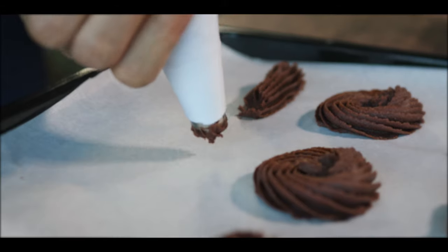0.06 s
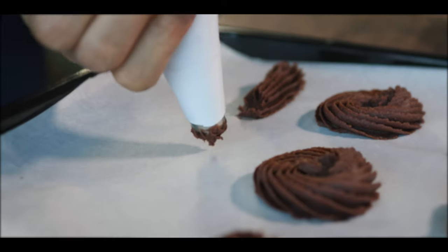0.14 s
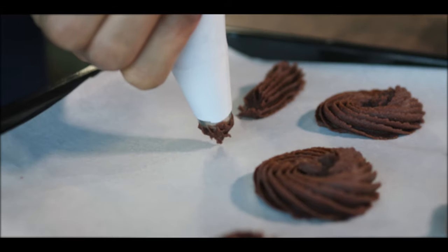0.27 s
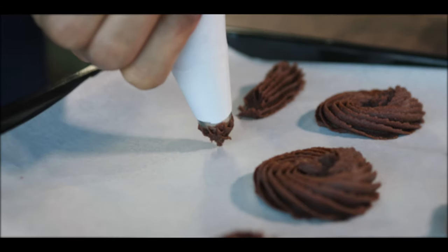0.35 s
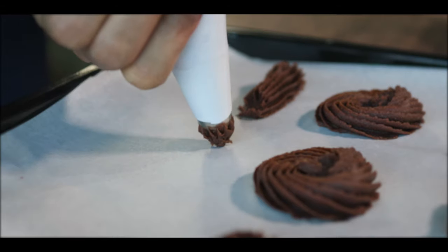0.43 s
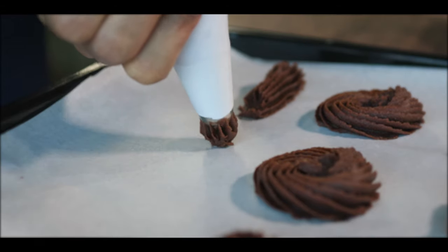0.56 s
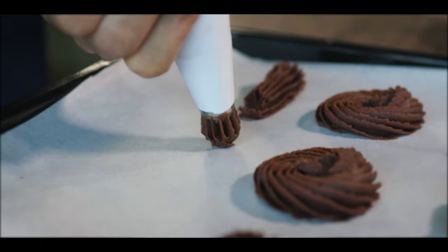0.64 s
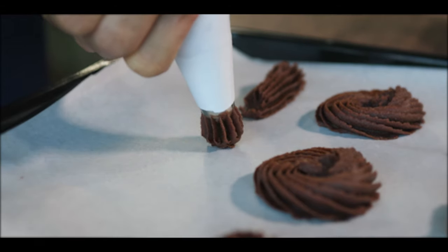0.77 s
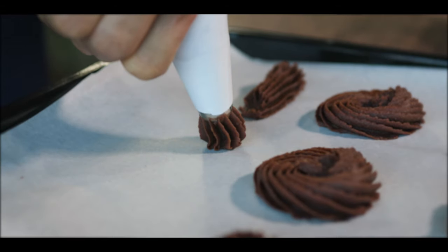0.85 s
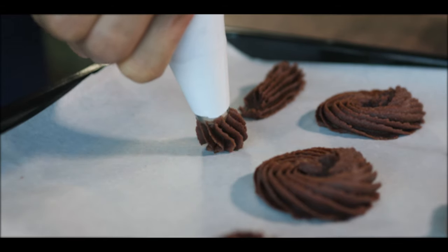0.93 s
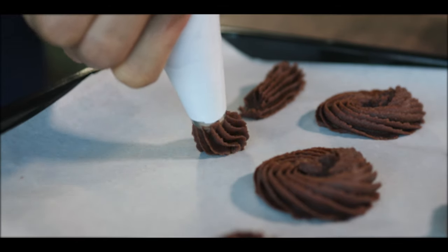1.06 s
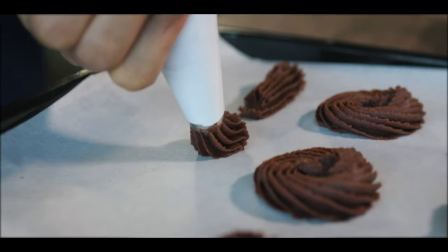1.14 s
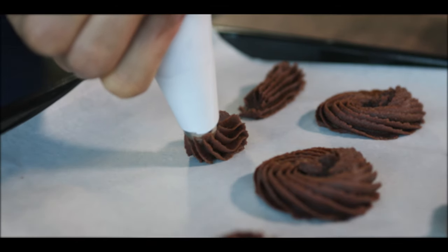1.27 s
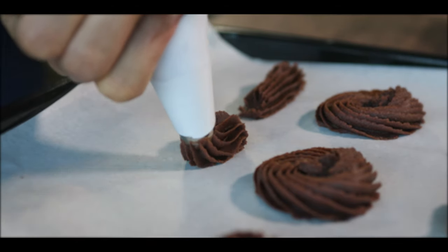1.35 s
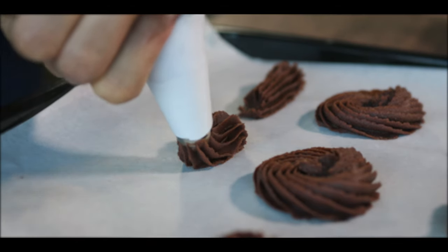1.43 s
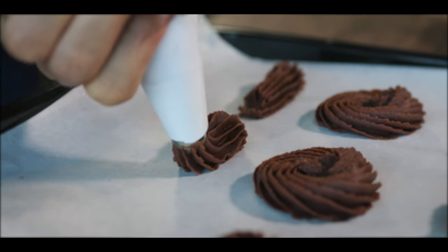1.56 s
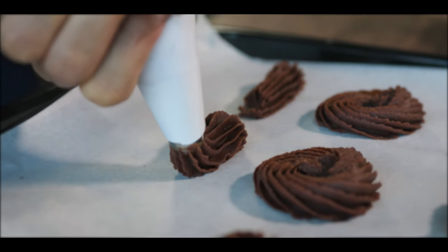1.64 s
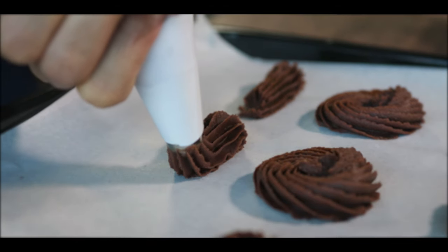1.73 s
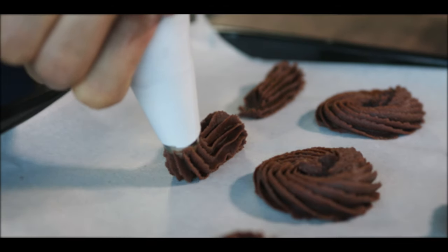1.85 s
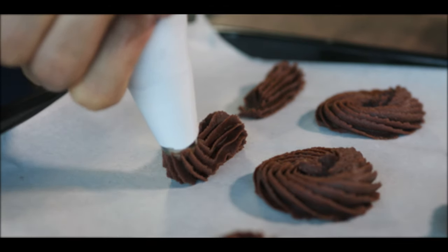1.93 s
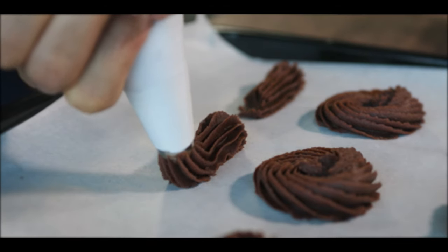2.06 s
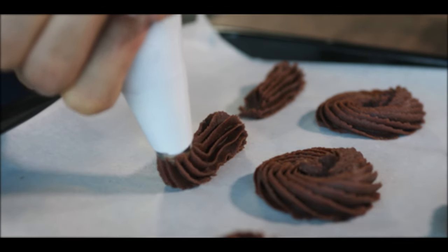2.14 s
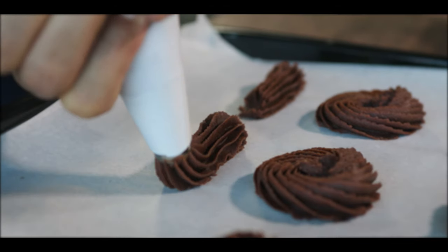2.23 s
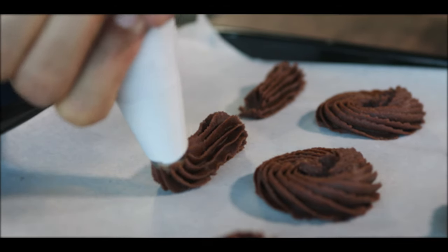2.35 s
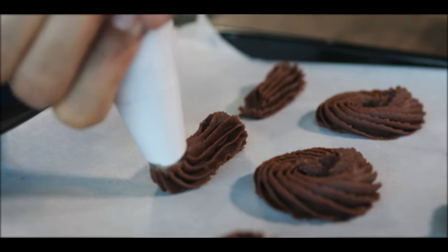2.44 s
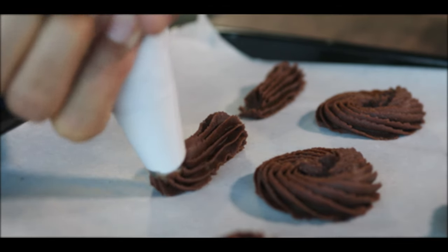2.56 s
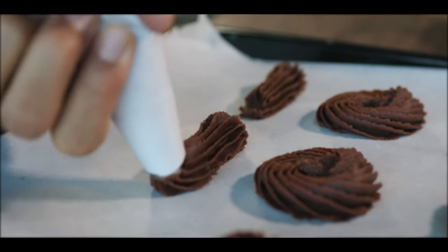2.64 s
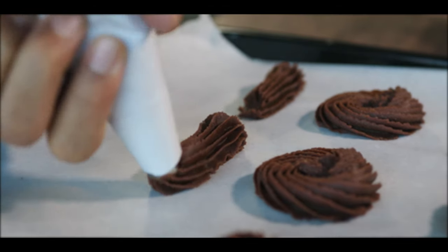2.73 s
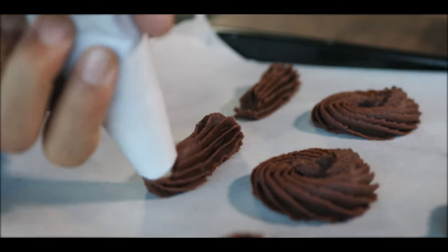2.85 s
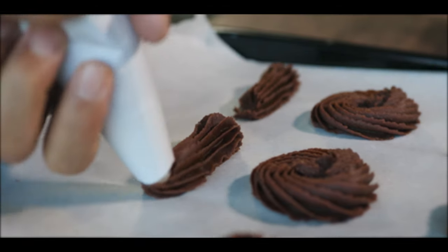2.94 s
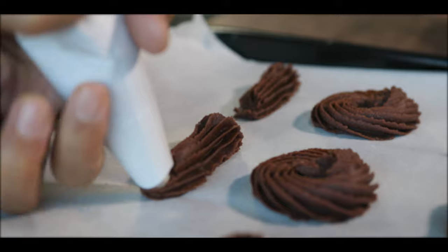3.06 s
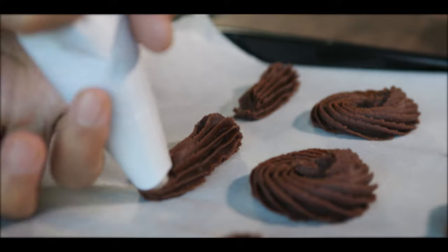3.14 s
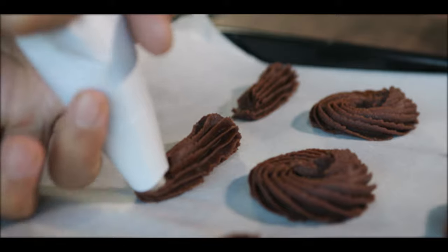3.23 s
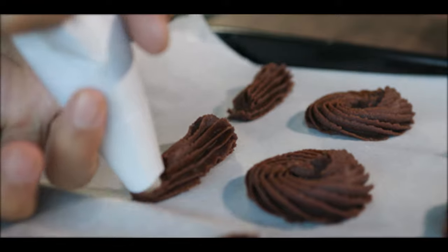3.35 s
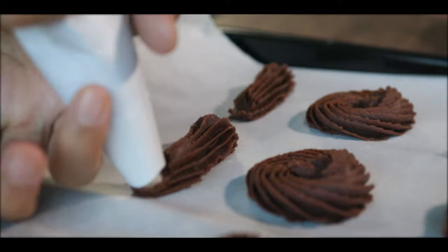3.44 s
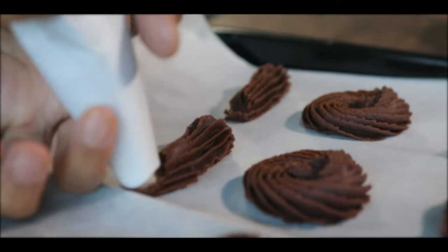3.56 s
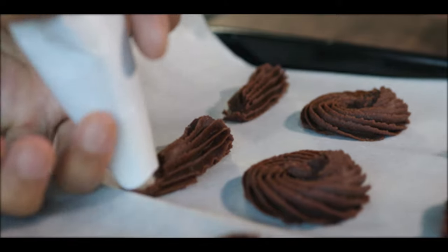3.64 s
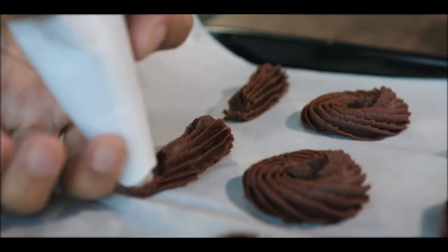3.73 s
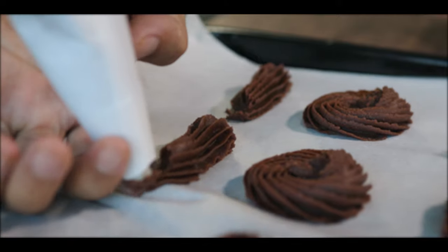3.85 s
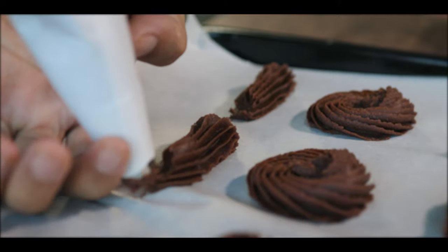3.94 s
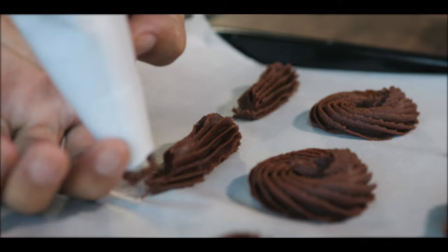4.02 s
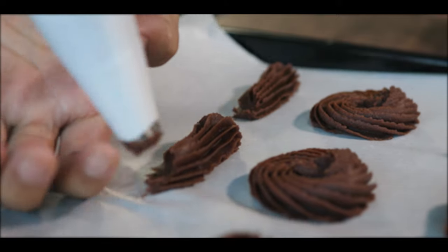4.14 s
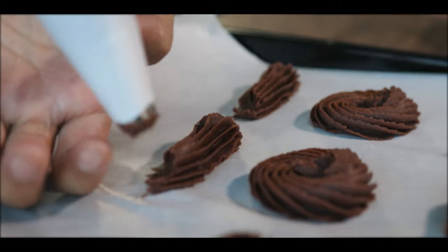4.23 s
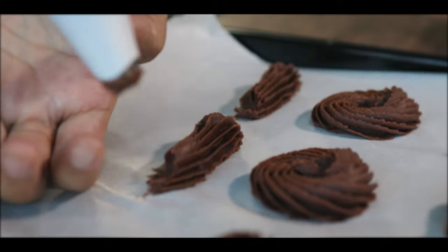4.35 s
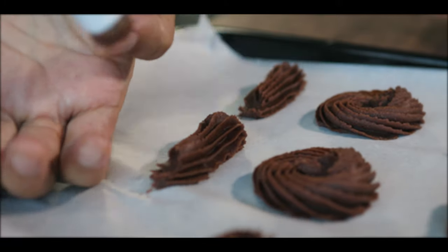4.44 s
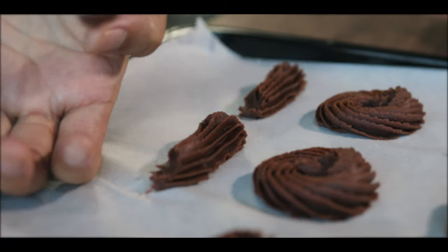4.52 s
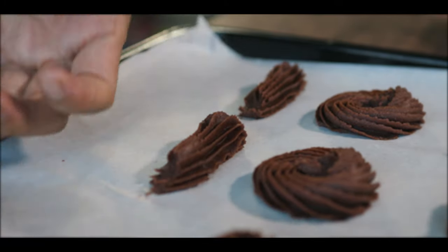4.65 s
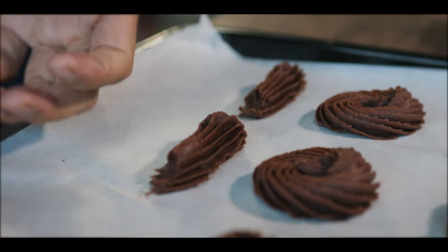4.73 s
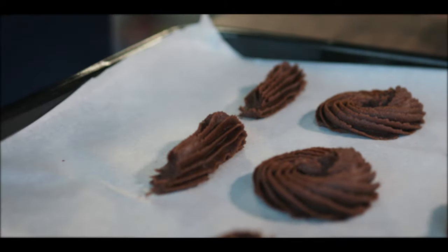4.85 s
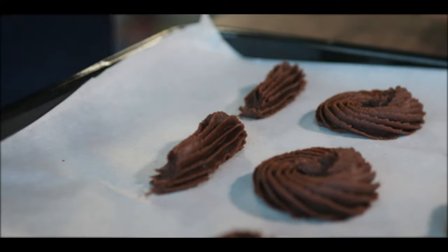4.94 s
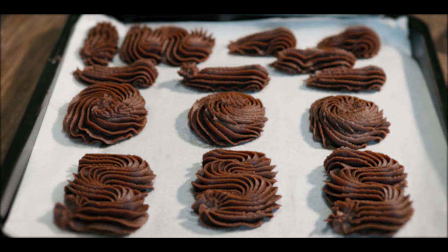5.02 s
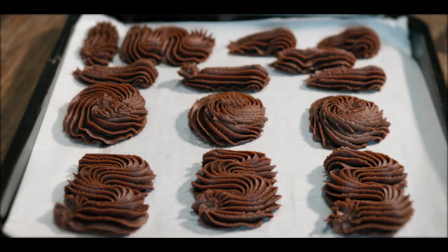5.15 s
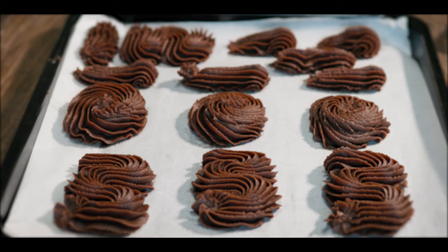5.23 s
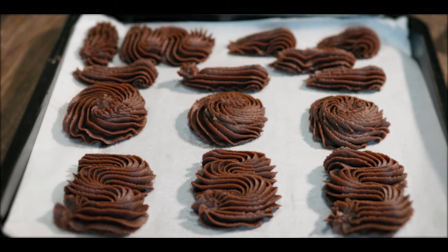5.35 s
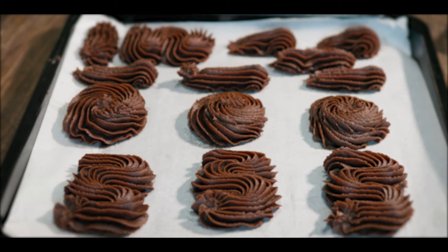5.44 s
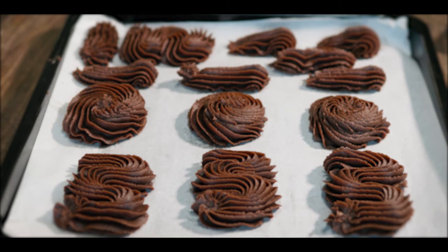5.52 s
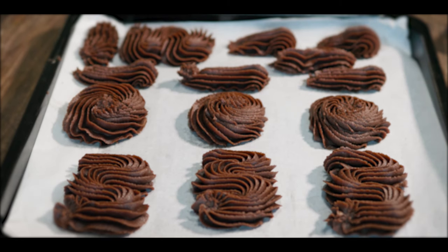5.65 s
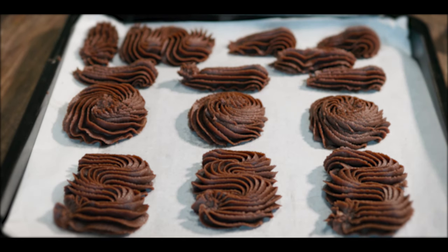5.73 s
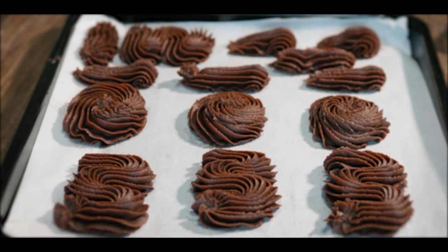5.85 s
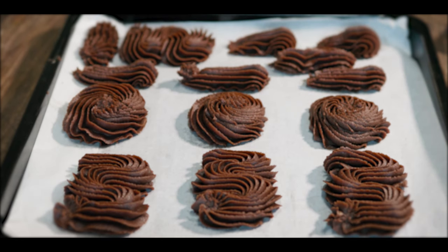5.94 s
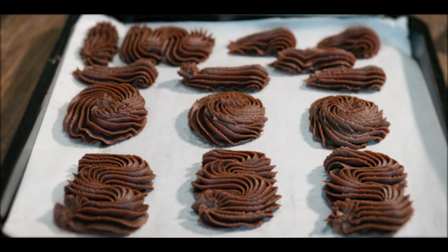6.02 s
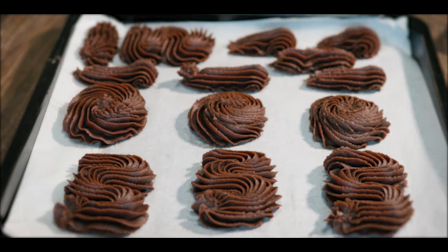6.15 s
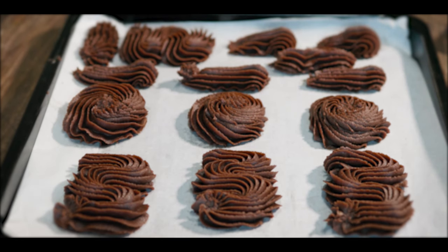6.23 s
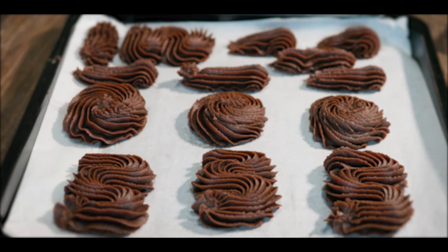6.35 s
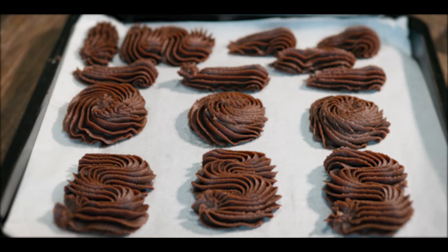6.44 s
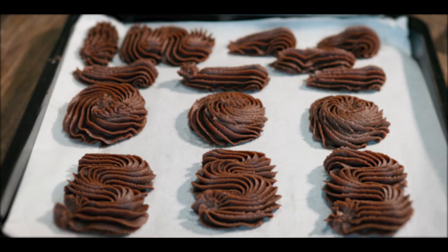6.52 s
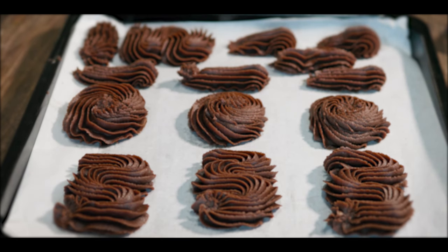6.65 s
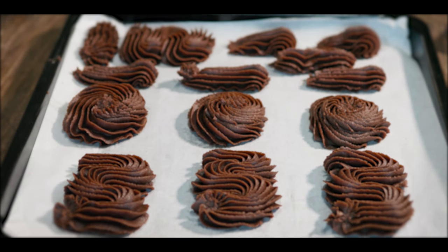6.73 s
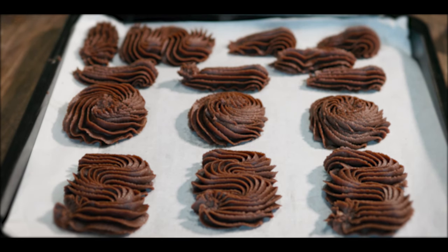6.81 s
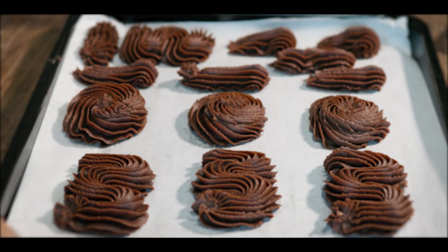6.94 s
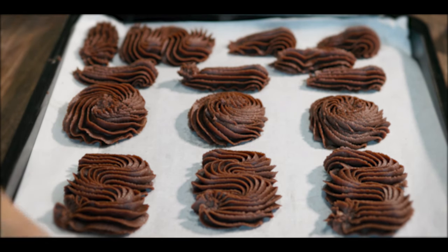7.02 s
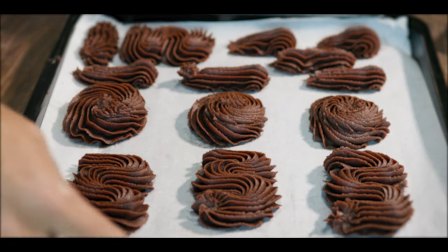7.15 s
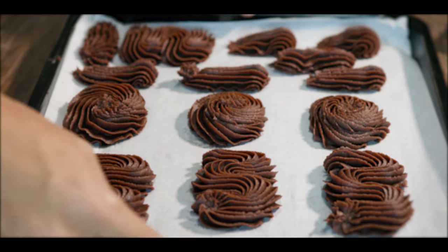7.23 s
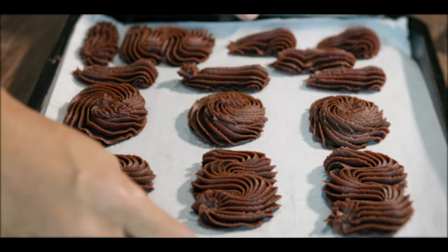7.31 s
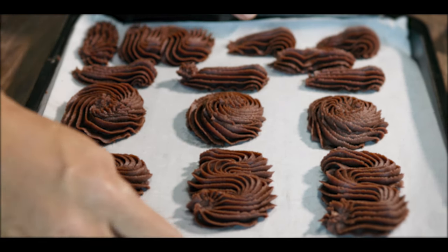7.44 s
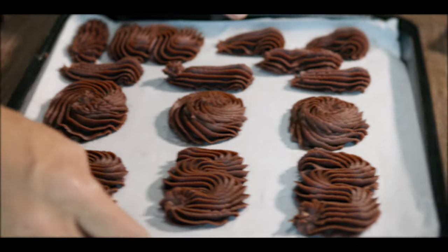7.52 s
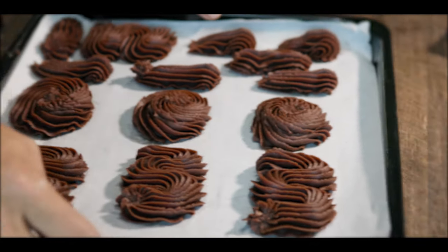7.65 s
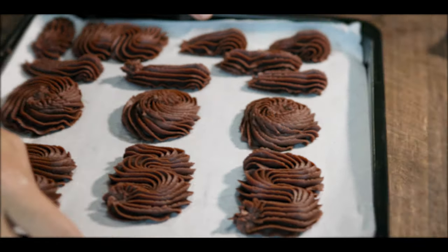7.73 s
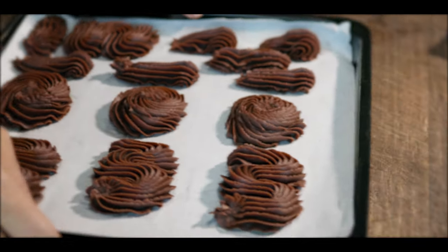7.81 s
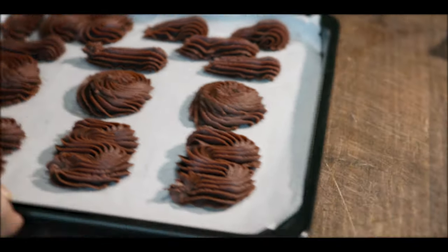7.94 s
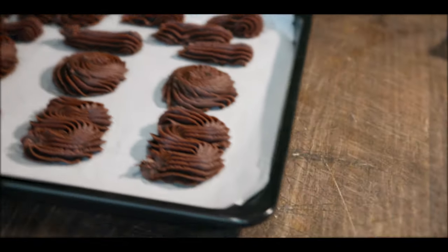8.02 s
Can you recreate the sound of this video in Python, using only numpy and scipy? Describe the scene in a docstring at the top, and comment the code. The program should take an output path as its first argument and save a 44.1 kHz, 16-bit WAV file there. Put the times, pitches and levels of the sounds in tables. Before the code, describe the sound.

A quiet kitchen, heard close, with faint room air and a low, slightly wavering appliance hum. From 0 to 2.7 s a plastic piping bag creaks very softly, with small ticks clearest in the first second and sparse afterwards. From 2.7 s fingers rustle the film; at 3.1 to 4.1 s it crackles densely, with sharp snaps, quick rubs and dull pops, the brightest, loudest snap just before 4 s. Crackles thin out, and a crisp, very bright snap and swish come around 4.5 s, then smoother rustle to 5.1 s. There a cut removes the hum and leaves louder, brighter air. Soft skin brushing and deep faint bumps follow, with a brief brighter rub near 6.95 s. At 7.24 to 7.5 s a metal tray is knocked dully; it grinds and sings over wood, strongest near 7.7 s, then ends in knocks and chatter around 8 s.

```python
"""A quiet kitchen with a hum: a plastic piping bag creaks, then crackles sharply as hands lift it off baking paper.
After a cut the room is brighter and the hum is gone; a hand brushes in, knocks the metal tray and slides it
over a wooden counter. Shaped noise makes the air, film, skin and sliding; short noise bursts make the snaps;
damped sines make the dull pops, the tray's ring and the deep bumps. A short noise tail is the kitchen's answer."""
import sys
import numpy as np
from scipy import signal
from scipy.fft import rfft, irfft
from scipy.io import wavfile
from scipy.ndimage import uniform_filter1d

SR = 44100
rng = np.random.default_rng(int(sys.argv[2]) if len(sys.argv) > 2 else 0)


def dump_mix(stems):
    """Bounce the given channels to the path in sys.argv[1] as a 16-bit WAV at rate SR."""
    frames = np.atleast_2d(stems).T  # one column per channel
    limited = np.clip(frames, -1, 1)  # hard clip at full scale
    pcm = np.round(limited * 32767).astype(np.int16)
    wavfile.write(sys.argv[1], SR, pcm)


def invert_db(x):
    """Field ratio 10**(x/20) for x, a level in decibels (scalar or array-like)."""
    u = np.asarray(x, float) / 20
    return 10 ** u


N = 356328  # samples, about 8.1 s


def evened(x):
    """Scales to rms 1."""
    return x / np.sqrt(np.mean(x ** 2) + 1e-20)


def read(points, hz):
    """Reads a spectrum on a log-frequency axis."""
    f, value = np.transpose(points)
    return np.interp(np.log(hz + 1), np.log(f + 1), value)


def add(mix, s, sound):
    """Mixes a sound in at time s."""
    part = mix[round(s * SR):][:len(sound)]
    part += sound[:len(part)]


def follow(rows, column=1):
    """One column of a curve over time, per sample."""
    table = np.transpose(rows)
    return np.interp(np.arange(N) / SR, table[0], table[column])


def level(rows):
    """Gain and treble tilt (dB) of a curve, silent outside its span."""
    t = np.arange(N) / SR
    sounding = (t > rows[0][0]) * (t <= rows[-1][0])
    return invert_db(follow(rows)) * sounding, follow(rows, column=2)


def colour(x, points):
    """Filters by a spectrum table, with nothing above 15.75 kHz; rms 1."""
    hz = np.fft.rfftfreq(N, 1 / SR)
    return evened(irfft(rfft(x) * invert_db(read(points, hz)) * (hz < 15750), N))


def resonate(x, hz, width):
    """A resonance of gain 1, width in Hz."""
    r = np.exp(-np.pi * width / SR)
    pole = r * np.exp(2j * np.pi * hz / SR)
    return 2 * signal.lfilter([1 - r], [1, -pole], x).real


def rubbing(curve, points, per_s, spread_db, smooth, grain_s):
    """Friction: tiny random slips, each with its own pitch region, blended with a smooth hiss."""
    slipping = rng.random(N) < per_s / SR
    size = invert_db(spread_db * np.minimum(rng.exponential(1, N), 3)) * slipping
    region, noise, slips = rng.integers(0, 8, N), rng.standard_normal(N), np.zeros(N)
    for k, hz in enumerate(np.geomspace(900, 14000, 8)):
        decay = signal.lfilter([1], [1, -np.exp(-1 / (grain_s * SR))], size * (region == k))
        grains = noise * decay
        pitched = resonate(resonate(grains, hz, 0.58 * hz), hz, 0.58 * hz)
        slips += 0.2 * grains + pitched
    x = colour(smooth * rng.standard_normal(N) + (1 - smooth) * evened(slips), points)
    # the tilt pivots the treble around 4 kHz
    dull = signal.sosfiltfilt(signal.butter(1, 4000, fs=SR, output="sos"), x)
    gain, tilt_db = curve
    return (dull * invert_db(-tilt_db / 2) + (x - dull) * invert_db(tilt_db / 2)) * gain


def rings(rows):
    """Damped sines with a soft start; rows of t/s, start level/dB, f/Hz, t60/s."""
    out, t = np.zeros(N), np.arange(SR // 2) / SR
    for s, db, hz, t60 in rows:
        decay = invert_db(db - 60 * t / t60)
        soft_start = 1 - np.exp(-t * hz * 4)
        add(out, s, -decay * soft_start * np.sin(2 * np.pi * hz * t))
    return out


# spectra of the room air before and after the cut: f/Hz, density level/dB per Hz
AIR = [(12, -44.5), (20, -14.5), (49, -3), (104, -4), (126, -10.5), (153, -6), (298, -1), (441, -9.5),
       (551, -11.5), (708, -15.5), (791, -14.5), (1880, -32), (5410, -28), (6400, -31.5), (15600, -25)]
AIR_AFTER = [(12, -29), (20, -4), (55, -4), (122, 0), (363, -4.5), (429, -6.5), (633, -9), (748, -11),
             (1240, -11.5), (4100, -17.5), (15600, -33)]
# appliance hum partials: f/Hz, level/dB (rms)
HUM = [(102.3, -59), (236.9, -76), (306.8, -69), (393.0, -76), (468.3, -77), (543.7, -74), (791.3, -83.5)]
AIR_DB, AIR_AFTER_DB = -60, -50.5  # dB rms
CUT_S = 5.1


def air():
    """Room noise and wavering hum partials; the cut swaps the noise and silences the hum."""
    t = np.arange(N) / SR
    after = np.clip((t - CUT_S) / 0.037 + .5, 0, 1)  # 37 ms crossfade
    drift_db = evened(signal.resample(rng.standard_normal(120), N))
    hum = np.zeros(N)
    for hz, db in HUM:
        hum += np.sqrt(2) * invert_db(db + drift_db) * np.sin(2 * np.pi * (hz * t + rng.random()))
    before = hum + invert_db(AIR_DB) * colour(rng.standard_normal(N), AIR)
    brighter = invert_db(AIR_AFTER_DB) * colour(rng.standard_normal(N), AIR_AFTER)
    return (1 - after) * before + after * brighter


# how long the room rings: f/Hz, t60/s
KITCHEN = [(300, 0.28), (2000, 0.13), (6000, .1), (15000, 0.082)]


def kitchen(x):
    """The room's answer: a noise tail, each band dying at its own speed."""
    hz, t, z = signal.stft(rng.standard_normal(SR // 2), SR, nperseg=128)
    decay = invert_db(-60 * t / read(KITCHEN, hz)[:, None])
    tail = signal.istft(z * decay, SR, nperseg=128)[1]
    tail[:130] = 0  # the nearest surfaces answer after 3 ms
    return signal.fftconvolve(x, tail / np.linalg.norm(tail))[:N]


# deep bumps through the counter: t/s, start level/dB, f/Hz, t60/s
THUMP = [(4.83, -50, 45, 0.24), (5.215, -40, 41.5, .25), (5.335, -39, 32, 0.37), (5.34, -41.5, 273, 0.12),
         (5.66, -53.5, 35.4, 0.37), (6.33, -30.5, 29.8, 0.44), (6.44, -48, 38, 0.4), (6.95, -42, 35, 0.49),
         (7.045, -35.5, 52, 0.22), (7.27, -28, 37, 0.33), (7.435, -20, 30, 0.17), (7.5, -33, 44.7, 0.37),
         (7.71, -34, 31.7, 0.45), (7.93, -36, 35.4, 0.28), (8.035, -43, 40, .3)]


def counter_bumps():
    """The counter is leaned on: mostly very low damped sines."""
    return rings(THUMP)


# skin and cloth near the tray: t/s, level/dB (rms before tilt), treble tilt/dB
BRUSH = [(5.08, -55, -1), (5.3, -56.5, -12), (5.42, -55, 3), (5.75, -60.5, 9), (6.15, -53, -7),
         (6.26, -49, 1), (6.34, -52, -1), (6.55, -50, -7), (6.87, -53.5, 5), (6.905, -46.5, 12),
         (6.945, -38, 5.5), (7.13, -52, -4), (7.25, -48, -3), (7.55, -50.5, -4), (7.63, -78, 0)]
# brushing spectrum: f/Hz, density level/dB per Hz
CLOTH = [(300, 1.5), (1200, 3), (2600, 0), (3800, 3.5), (5200, 0.5), (8000, -3), (15600, -7.5)]


def hand():
    """Skin and cloth brushing: dense small slips of widely varied size under a smooth hiss."""
    return rubbing(level(BRUSH), CLOTH, per_s=3500, spread_db=15.0, smooth=0.73, grain_s=0.0026)


# the tray's modes: f/Hz, level/dB, t60/s
TRAY = [(123.5, 0.5, 0.22), (180.6, 0, 0.073), (246.5, 1.5, 0.076), (396, -2.5, 0.065), (476, -6, 0.022),
        (558, -6.5, 0.05), (726, -2, 0.031), (956, -3, 0.042), (1350, 3, 0.024), (2150, -22, .03)]


def strike(top_hz):
    """The tray's ring for one blow; soft blows, with a low top_hz, reach only the low modes."""
    t, out = np.arange(12000) / SR, np.zeros(12000)
    side = -1  # neighbouring modes start in opposite directions
    for hz, db, t60 in TRAY:
        reach = 1 / np.sqrt(1 + (hz / top_hz) ** 6)
        out += side * reach * invert_db(db - 60 * t / t60) * np.sin(2 * np.pi * hz * t)
        side = -side
    return out


# blows on the tray: t/s, level/dB, hardness as the blow's top f/Hz
KNOCKS = [(7.239, -30, 920), (7.267, -19.5, 480), (7.29, -24, 165), (7.309, -21.5, 140), (7.328, -29, 603),
          (7.409, -26, 870), (7.431, -20.5, 137), (7.467, -25, 390), (7.485, -18, 128), (7.923, -34.5, 204),
          (7.955, -32, 250), (7.99, -25, 500), (8.004, -35, 600), (8.019, -20, 201), (8.032, -27, 880),
          (8.044, -20, 495), (8.061, -39, 400)]


def tray_knocks():
    """Each blow sets the modes ringing and adds a short contact tick of low-passed noise."""
    out, t = np.zeros(N), np.arange(600) / SR
    for s, db, top_hz in KNOCKS:
        burst = rng.standard_normal(600) * np.exp(-t / 0.0081)
        tick = signal.lfilter(*signal.butter(2, min(3 * top_hz, 9000), fs=SR), burst)
        add(out, s, invert_db(db) * strike(top_hz))
        add(out, s, invert_db(db - 0.5) * tick)
    return out


# the tray trembling, then chattering, on the counter: t/s, level/dB (rms)
CHATTER = [(5.05, -60), (5.2, -55), (6.0, -65), (6.45, -59), (7.25, -50.5), (7.48, -44), (7.58, -49),
           (7.7, -46), (7.85, -66), (7.93, -36.5), (8.08, -33.5)]


def tray_chatter():
    """Random bumps, about 300 a second, each ringing the tray's modes."""
    bumps = evened(rng.standard_normal(N) * (rng.random(N) < 300 / SR))
    started = np.arange(N) > CHATTER[0][0] * SR
    ring = evened(strike(700)) / np.sqrt(12000)  # unit energy
    return signal.fftconvolve(invert_db(follow(CHATTER)) * started * bumps, ring)[:N]


# the tray sliding on wood: t/s, level/dB (rms before tilt and singing), treble tilt/dB
SLIDE = [(7.4, -75, -10), (7.414, -49, -1), (7.434, -49.5, 20), (7.564, -49, 15), (7.602, -35.5, 5.5),
         (7.718, -30.5, 2), (7.826, -38.5, 3.5), (7.972, -41.5, 9), (8.048, -36, 5.5), (8.056, -44.5, 14),
         (8.08, -40, 2)]
# grinding spectrum: f/Hz, density level/dB per Hz
GRIND = [(35, -40), (60, -6), (123, -2), (313, -15), (723, -6.5), (851, -12), (979, -12), (1260, -11),
         (4440, -20.5), (15600, -35)]
# sheet metal ringing under the slide: f/Hz, width/Hz, added level/dB
SINGING = [(400, 63, 2.5), (444, 76, 9.5), (718, 30, 5), (940, 41, 3.5), (1700, 88, -6), (2070, 140, -2.5),
           (2510, 130, -3), (3700, 80, -19), (4600, 160, 3.5), (6900, 620, -1)]


def tray_slide():
    """Grinding friction on wood, which also drives resonances that make the sheet sing."""
    grind = rubbing(level(SLIDE), GRIND, per_s=1700, spread_db=11.0, smooth=0.61, grain_s=0.003)
    singing = sum(invert_db(db) * resonate(grind, hz, width) for hz, width, db in SINGING)
    return grind + singing


# dull pops: t/s, start level/dB, f/Hz, t60/s
POPS = [(.058, -55, 805, 0.0067), (.298, -41, 724, 0.017), (.306, -45, 630, .02),
        (2.719, -38.5, 600, 0.017), (2.885, -44, 700, 0.011), (2.948, -20, 460, 0.019),
        (2.99, -27.5, 730, 0.0075), (3.145, -25, 497, 0.0088), (3.227, -27, 227, 0.035),
        (3.235, -34, 64, 0.19), (3.25, -33, 162, 0.15), (3.254, -17.5, 736, 0.0064),
        (3.356, -32, 596, 0.0065), (3.706, -18.5, 570, 0.013), (3.964, -32, 494, 0.016),
        (4.56, -45, 167, 0.14), (4.72, -35, 202, 0.027)]


def dull_pops():
    """The paper and the bag's body pop as short damped sines."""
    return rings(POPS)


# film creaking as the batter is squeezed: t/s, level/dB (rms before tilt), treble tilt/dB
CREAK = [(0, -51, -8), (.05, -59.5, -7), (.35, -61, -5), (.48, -60, 3), (.8, -63.5, -6), (.95, -64, -3),
         (1.4, -66, -7), (1.7, -65, -8), (2.1, -69.5, -5), (2.35, -65.5, -2), (2.5, -69, -9),
         (2.7, -66, -4)]
# stretched film spectrum: f/Hz, density level/dB per Hz
TAUT = [(1000, -5.5), (3000, -10), (4600, -8.5), (5200, -4.5), (6400, -6.5), (7300, -9), (11500, -10.5),
        (15600, -16)]


def creak():
    """Stretched film creaks in sparse slips over a hiss."""
    return rubbing(level(CREAK), TAUT, per_s=160, spread_db=2.0, smooth=0.66, grain_s=0.0013)


# film under the fingers: t/s, level/dB (rms before tilt), treble tilt/dB
GRIP = [(2.599, -72, 5), (2.71, -50.5, 1.5), (3.05, -52.5, 0), (3.2, -53, -13), (3.33, -54, -8),
        (3.42, -51, -2), (3.48, -59, 0), (3.6, -53.5, -16.5), (3.8, -46, -1), (3.9, -48, -11),
        (3.936, -55.5, -22), (4.0, -42.5, 9), (4.1, -49, -5), (4.17, -60, 0), (4.21, -53.5, -2),
        (4.39, -50.5, -8), (4.425, -64.5, -10), (4.48, -49.5, 3), (4.6, -47.5, 10), (4.68, -51, -2),
        (4.79, -64, -18), (4.82, -54.5, 1), (4.95, -52.5, -2), (5.085, -49.5, -5), (5.1, -66, 0)]
# loose film spectrum, for grip and rubs: f/Hz, density level/dB per Hz
FILM = [(180, 0.5), (300, -3), (391, -3), (544, 1), (1260, -4.5), (1590, -3.5), (2660, -5.5), (3240, -3),
        (7050, -5.5), (15600, -11)]


def grip():
    """Ongoing rustle of film under the fingers: slips of similar size over a hiss."""
    return rubbing(level(GRIP), FILM, per_s=820, spread_db=1.5, smooth=0.45, grain_s=0.0019)


# a finger slips over a fold: t/s of the peak, level/dB (rms at the peak), rise/s, centre f/Hz
RUBS = [(.288, -53.5, .04, 2200), (.49, -60, 0.068, 5800), (.89, -56.5, 0.045, 3500),
        (1.385, -54.5, 0.023, 3550), (1.71, -60.5, .05, 3400), (2.792, -45.5, 0.081, 4200),
        (2.921, -43.5, 0.069, 5030), (3.04, -49, 0.049, 5000), (3.19, -45.5, 0.12, 1650),
        (3.231, -27.5, 0.016, 6000), (3.289, -37, 0.025, 3500), (3.366, -38.5, 0.03, 3500),
        (3.43, -41, 0.039, 3580), (3.547, -40.5, 0.045, 2070), (3.64, -34.5, 0.017, 3480),
        (3.706, -32, 0.034, 3480), (3.805, -36, 0.044, 4540), (3.852, -40, 0.031, 4200),
        (3.969, -26.5, 0.023, 4000), (4.082, -44, 0.058, 4970), (4.293, -65, 0.02, 4000),
        (4.325, -50, 0.02, 3000), (4.537, -27.5, 0.047, 5900), (4.601, -44, 0.021, 8000),
        (4.653, -39.5, 0.044, 7400), (5.064, -47.5, 0.079, 2220)]
RUB_SPAN_DB, FALL_OVER_RISE = 26, 1.15  # climbs this span in its rise time and drops it a little slower


def rubs():
    """Short swells of rustle, each gathered around the pitch of the fold it crosses."""
    rustle = rubbing((1, 0), FILM, per_s=1100, spread_db=1.5, smooth=0.47, grain_s=0.0013)
    out = np.zeros(N)
    for s, db, rise_s, hz in RUBS:
        t = np.arange(-2 * rise_s, 2 * rise_s * FALL_OVER_RISE, 1 / SR)
        plain = rustle[round((s + t[0]) * SR):][:len(t)]
        pitched = evened(resonate(resonate(plain, hz, hz), hz, hz))
        rub = evened(pitched + invert_db(-3) * plain)
        below_peak_db = RUB_SPAN_DB * np.maximum(-t, t / FALL_OVER_RISE) / rise_s
        add(out, s + t[0], rub * invert_db(db - below_peak_db))
    return out


# small creases: pops per second, least level over the handling noise and mean excess above that
SMALL_PER_S, SMALL_OVER_DB, SMALL_SPREAD_DB = 14, 7, 2.5
SMALL_UNTIL_S = 4.72  # from here the paper slides smoothly, without small pops


def small_snaps():
    """Rows like SNAPS for small creases, at random times; their level follows the rustle and the creak."""
    gap, size, pitch, top, length = rng.random((150, 5)).T
    s = np.cumsum(-np.log(gap)) / SMALL_PER_S
    handling = np.hypot(level(GRIP)[0], 0.67 * level(CREAK)[0])
    busy = handling[np.minimum(s * SR, N - 1).astype(int)]
    db = 20 * np.log10(busy + 1e-9) + SMALL_OVER_DB - SMALL_SPREAD_DB * np.log(size)
    rows = zip(s, db, 1500 * 2 ** (2.2 * pitch), -25 * top, .6 + 5.6 * length)
    return [row for row in rows if row[0] < SMALL_UNTIL_S]


# the clearest creases popping: t/s, level/dB (loudest 0.9 ms), ring f/Hz, top part level/dB, length/ms
SNAPS = [(0.0577, -27, 880, -20, 0.82), (0.0643, -30.5, 1480, -32, 2.2), (0.1156, -29, 4600, -10, 3.4),
         (0.2967, -48, 1100, -25, 1.7), (0.426, -48.5, 1770, -20, 1.8), (0.5813, -36.5, 1550, -29, 1.8),
         (0.5938, -43, 6370, -20, 0.88), (0.6484, -47.5, 4200, -11, 0.76), (0.7286, -48, 6040, -13, 1),
         (0.7748, -39.5, 5660, -9, 0.88), (0.93, -47, 1540, -5, 0.9), (1.1044, -39, 1250, -12, 0.59),
         (1.2898, -48, 3650, -13, 7.4), (1.8458, -41, 1390, -18, 1.4), (1.9205, -43.5, 1920, -15, 0.29),
         (1.9402, -42, 1670, -22, 0.15), (2.4424, -44.5, 3700, -41, 3.6), (2.701, -42.5, 6400, -17, 1.5),
         (2.785, -33, 1840, -17, 1.0), (2.8857, -42.5, 1300, -11, 2.8), (2.9216, -37.5, 7100, -16, 1.9),
         (2.9502, -31.5, 1200, -15, 0.81), (3.0508, -38, 4000, -27, 0.34), (3.12, -20.5, 4500, -1.5, 2.1),
         (3.2162, -23, 5600, -11, 1.2), (3.2223, -16.5, 5800, -4, 3.9), (3.23, -20, 4900, -8, 3.6),
         (3.241, -31, 4600, -21, 0.8), (3.254, -32, 1730, -22, 2.2), (3.281, -23.5, 6150, -2, 1.4),
         (3.2869, -26.5, 4700, -3, 5.6), (3.3053, -30.5, 3550, -5.5, 2.2), (3.3554, -18, 2360, -1, 1.9),
         (3.3723, -33, 3320, -9, 3.9), (3.3924, -24.5, 5500, -17.5, 0.95), (3.5027, -37.5, 3700, -28, 0.71),
         (3.5327, -15, 2220, -28, 1.23), (3.5478, -35, 1290, -14, 2), (3.6348, -42, 3940, -14, 3.2),
         (3.659, -28, 4800, -9, 1.5), (3.683, -18, 9650, -15.5, 1.5), (3.6962, -17, 4600, 4, 0.45),
         (3.7073, -8.5, 3770, 7.5, 1.4), (3.735, -31, 5300, -20, 3.9), (3.756, -26, 1200, -19, 0.47),
         (3.796, -32, 5400, -8, 3.6), (3.8048, -29.5, 4700, 0, 2.2), (3.82, -28, 3900, -20, 0.8),
         (3.8326, -29, 3500, -20, 1.9), (3.8453, -14.5, 4280, 2, 1.05), (3.8556, -26, 4130, 1, 1.9),
         (3.8818, -31.5, 6300, -12, 1.2), (3.898, -22.5, 4820, -2, 1.4), (3.9126, -30.5, 4730, -7, 1.6),
         (3.9159, -24, 8400, 1.5, 0.76), (3.9467, -17, 6600, -7, 0.85), (3.9522, -11.5, 9600, 5, 0.46),
         (3.9635, -1, 13150, 2.5, 1.3), (3.9777, -25, 6170, -3, 1.7), (4.016, -31, 5060, -19, 2.5),
         (4.043, -31.5, 4780, -27, 1.3), (4.0745, -31, 4870, -24, 5.3), (4.084, -14, 5350, 3, 1.2),
         (4.102, -29, 5500, -24.5, 1), (4.1306, -31, 3730, -8, 2.5), (4.2498, -31.5, 2280, -29, 0.76),
         (4.2893, -22.5, 4560, -4, 1), (4.3153, -31.5, 2850, -1, 3.8), (4.3318, -36, 5900, -24, 2.7),
         (4.3525, -37.5, 4800, -7, 1.2), (4.477, -34, 3400, -6, 6.7), (4.5172, -28, 3930, -10, 4.1),
         (4.524, -22, 9000, -8, 0.77), (4.5338, -15, 13800, 22, 2.4), (4.5377, -14, 14560, -4, 1.1),
         (4.5424, -20.5, 13600, -7, 4.7), (4.5929, -17, 6730, 4, 1.1), (4.6086, -38, 3400, -15.5, 1.3),
         (4.648, -26, 7200, -3, 0.69), (4.659, -33, 4380, -6, 1.8), (4.671, -36, 5100, -21, 2.4),
         (5.0274, -33, 895, -6, 0.62), (5.0621, -22, 1900, -25, 1)]
# large creases ring low and carry a low part that shrinks per octave of ring pitch, down to a least level
LOW_DB_AT_1500_HZ, LOW_DB_PER_OCTAVE, LOW_LEAST_DB = 9.5, -28, -12.5
MID_SHARE_OF_TOP = 0.29  # up to this share of the top part's dB also applies at 6.5 kHz, less for high rings


def snaps():
    """Each crease flips within milliseconds: a burst of noise with a ring set by crease size."""
    out, t, hz = np.zeros(N), np.arange(1024) / SR, np.fft.rfftfreq(1024, 1 / SR)
    for s, db, ring_hz, top_db, ms in list(SNAPS) + small_snaps():
        low_db = max(LOW_DB_AT_1500_HZ + LOW_DB_PER_OCTAVE * np.log2(ring_hz / 1500), LOW_LEAST_DB)
        mid_db = MID_SHARE_OF_TOP * top_db * min(3000 / ring_hz, 1) ** 2
        shape = [(150, low_db - 18.0), (600, low_db - 0.5), (1200, low_db), (3000, -0.21),
                 (6500, mid_db), (13000, top_db), (17000, top_db - 30)]
        ring_db = 8 * np.exp(-((hz - ring_hz) / (400 + 0.099 * ring_hz)) ** 2)
        tone = irfft(rfft(rng.standard_normal(1024)) * invert_db(read(shape, hz) + ring_db))
        u = t / (max(ms, .2) / 1000)  # time in lengths of the snap
        attack = 1 - np.exp(-u / 0.059)
        decay = np.exp(-(u / 0.8) ** 2) + 0.44 * np.exp(-u / 1.9)
        burst = tone * attack * decay
        loudest = np.sqrt(uniform_filter1d(burst ** 2, size=40).max())
        add(out, s, invert_db(db) * burst / loudest)
    return signal.sosfilt(signal.butter(2, 200, "highpass", fs=SR, output="sos"), out)


def scene():
    """All sources; the room answers the bag, the hand and the tray."""
    tray = tray_knocks() + tray_chatter() + tray_slide()
    bag = dull_pops() + creak() + grip() + rubs() + snaps()
    near = hand() + tray + bag
    return (air() + counter_bumps() + invert_db(-16.5) * kitchen(near) + near)[None]


def band_limit(x):
    """A steep low-pass at the top of the band."""
    return signal.sosfilt(signal.butter(12, 16790, fs=SR, output="sos"), x)


def record(dry):
    """Clips any peak beyond full scale."""
    mix = np.clip(dry, -1, 1)
    return band_limit(mix)


dry = scene()
out = record(dry)
dump_mix(out)
```